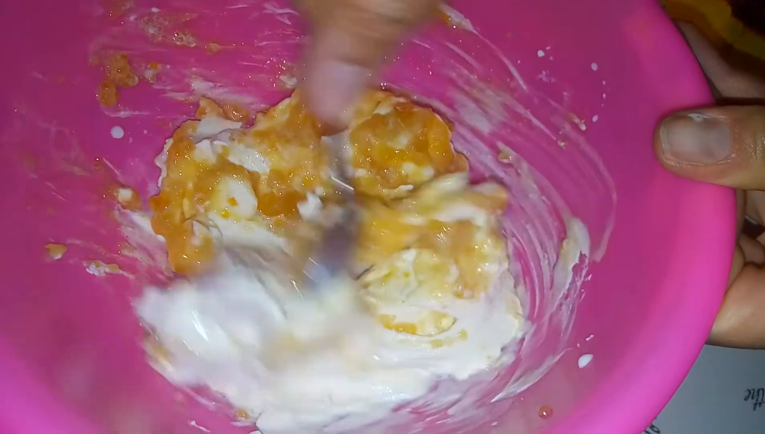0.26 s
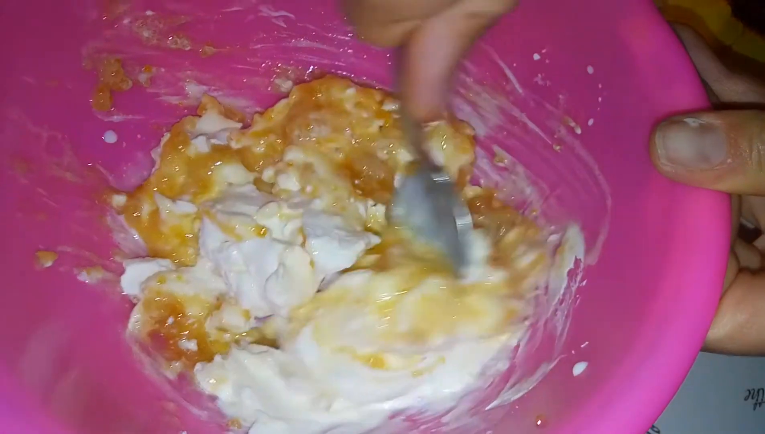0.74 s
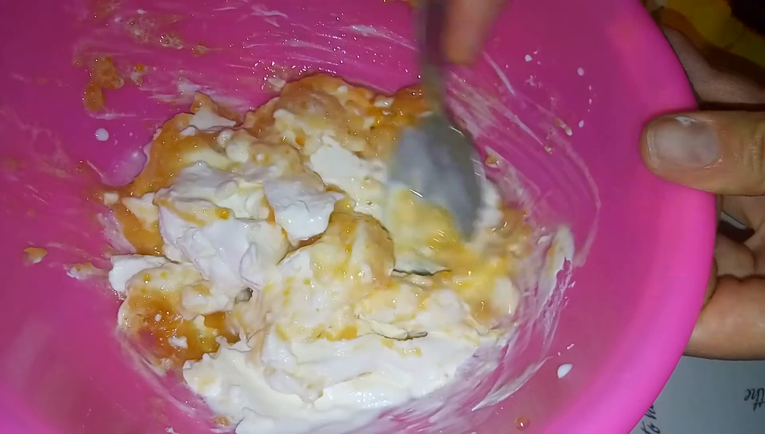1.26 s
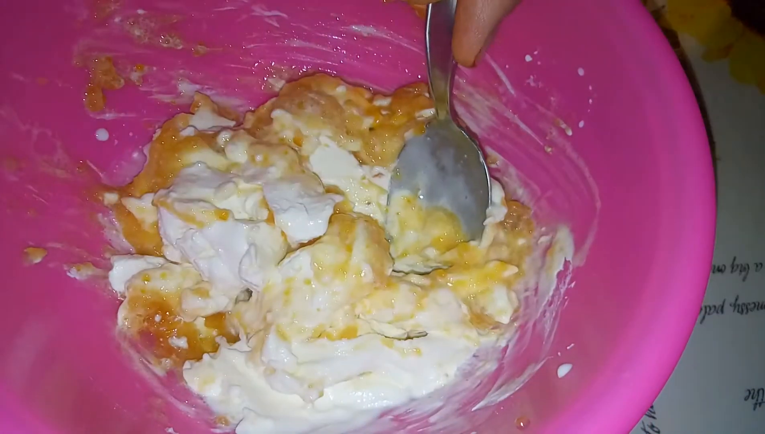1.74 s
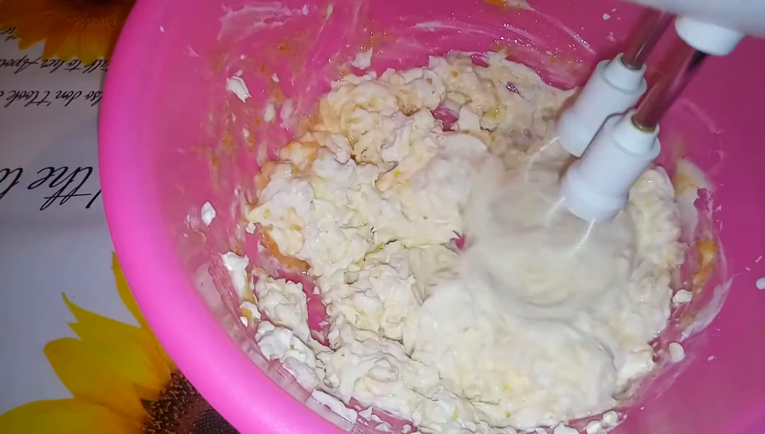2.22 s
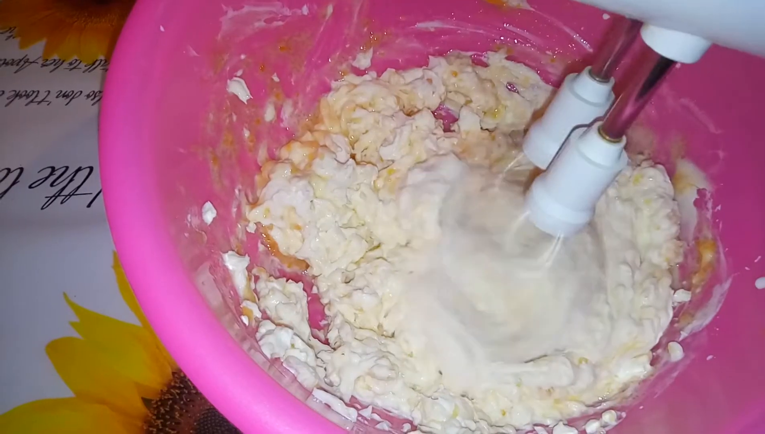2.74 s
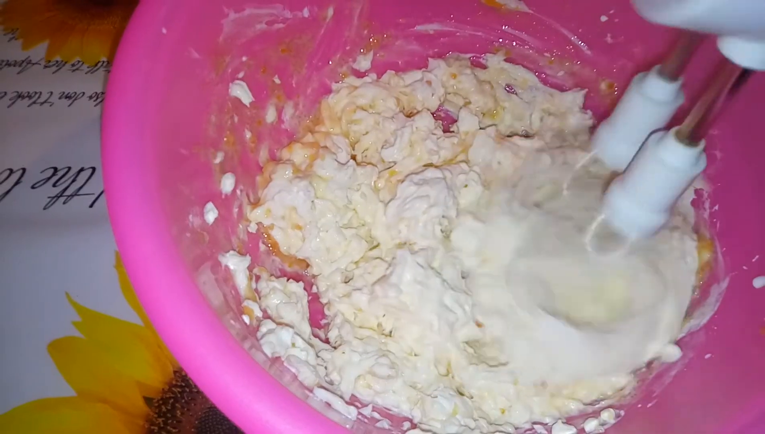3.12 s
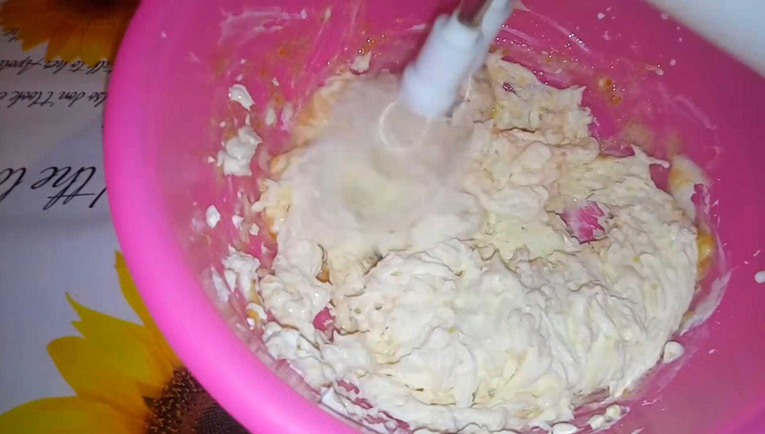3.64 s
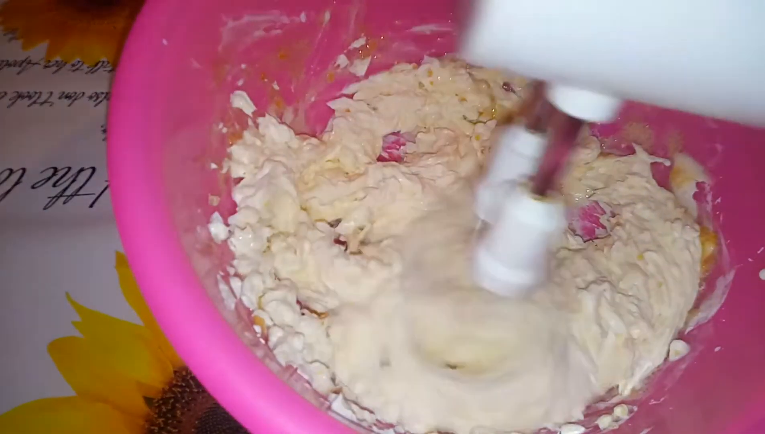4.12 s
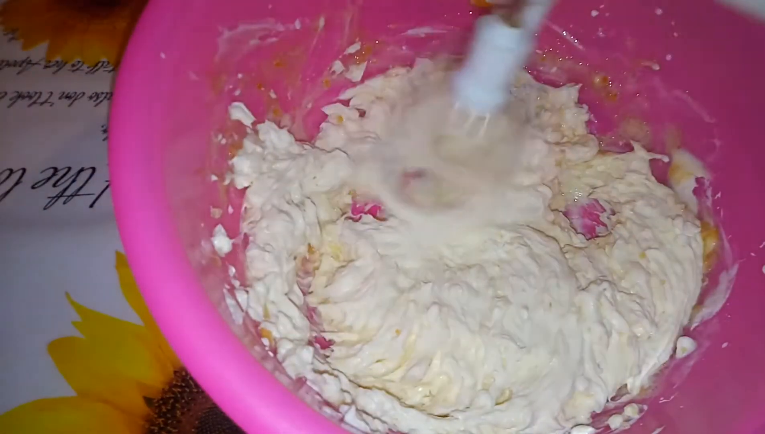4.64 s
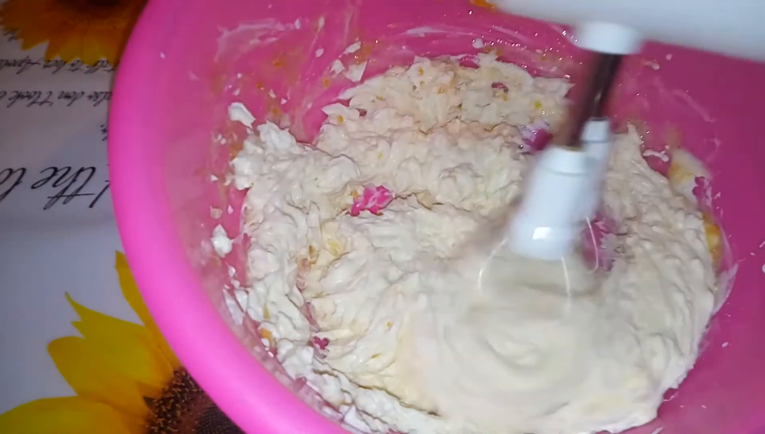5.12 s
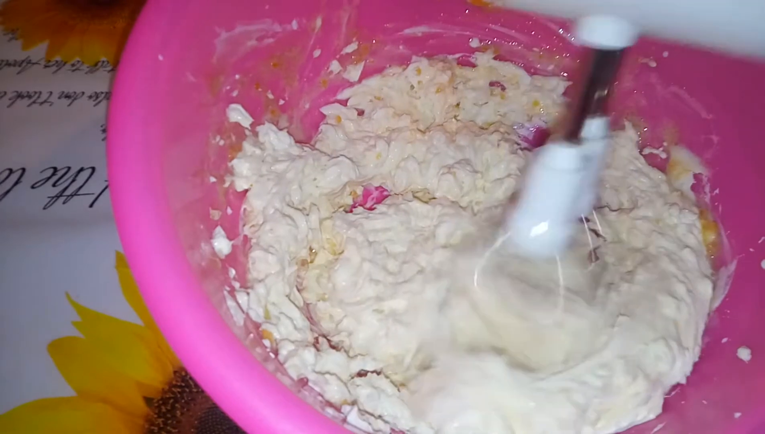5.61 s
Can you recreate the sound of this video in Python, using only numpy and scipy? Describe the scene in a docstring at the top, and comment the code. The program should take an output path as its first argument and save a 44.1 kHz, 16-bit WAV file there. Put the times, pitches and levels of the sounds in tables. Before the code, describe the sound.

Soft spoon clicks and scrapes in a bowl give way to a loud hand mixer whirring through cream, its air buffeting the microphone.

```python
"""Over the hum of a kitchen, a spoon drags, ticks and smacks through cream in a plastic bowl. At 2 s the scene
changes: a hand mixer runs close by, turning slowly, over a fainter hum; it is clicked up one step and whines.
Load bends its speed while the beaters drum the bowl. From 3.6 s, gusts from its vents buffet the microphone,
whose gain control ducks. One microphone, dull above 5 kHz."""
import sys
import numpy as np
from scipy import signal
from scipy.io import wavfile
from scipy.ndimage import uniform_filter1d

SR = 44100
rng = np.random.default_rng(int(sys.argv[2]) if len(sys.argv) > 2 else 0)


def wav_record(signal):
    """Record a signal, one row per channel, as 16-bit PCM in the file named by sys.argv[1]."""
    frames = np.transpose(np.atleast_2d(signal))
    bounded = np.clip(frames, -1, 1)
    # unit amplitude maps onto the largest positive 16-bit level
    quanta = np.round(bounded * 32767).astype(np.int16)
    wavfile.write(sys.argv[1], SR, quanta)


N = 258867
TIME_S = np.arange(N) / SR
CHANGE_S, STEP_S = 2.058, 2.661  # scene changes to the running mixer, mixer up one step

def gain_of(db):
    return 10 ** (np.asarray(db) / 20)

def unit_rms(x):
    return x / np.sqrt(np.mean(x ** 2) + 1e-20)

def butter(x, order, hz, kind="low"):
    return signal.sosfilt(signal.butter(order, hz, kind, fs=SR, output="sos"), x)

def band_rms(x, lo_hz, hi_hz):
    return np.std(butter(x, 4, [lo_hz, hi_hz], "band"))

def spectrum_db(points, hz):
    freq_hz, level_db = np.transpose(points)
    return np.interp(np.log(hz + 1), np.log(freq_hz + 1), level_db)

def follow(rows):
    """Each column after time_s, interpolated per sample."""
    time_s, *columns = np.transpose(rows)
    return [np.interp(TIME_S, time_s, column) for column in columns]

def ramp(start_s, rise_s):
    return np.clip((TIME_S - start_s) / rise_s, 0, 1)

def place(events):
    """Mix (start_s, sound) pairs into one track."""
    out = np.zeros(N)
    for start_s, sound in events:
        part = out[round(start_s * SR):][:len(sound)]
        part += sound[:len(part)]
    return out

def wander(rate_hz):
    """Smooth random drift, rms 1."""
    return unit_rms(butter(rng.standard_normal(N + SR), 2, rate_hz)[SR:])

def resonate(x, hz, width_hz, stages=1):
    """Unity-gain resonances in series: shift hz to zero, smooth, shift back."""
    carrier = np.exp(2j * np.pi * np.cumsum(np.full(len(x), hz)) / SR)
    pole = np.exp(-np.pi * width_hz / SR)
    for _ in range(stages):
        x = 2 * (carrier * signal.lfilter([1 - pole], [1, -pole], x / carrier + 1e-18)).real
    return x

def noise(db_at, patchy_db):
    """Noise shaped by db_at(hz, time_s), with drifting patches."""
    frames, hz = N // 256 + 5, np.fft.rfftfreq(1024, 1 / SR)[:, None]
    real, imag, patches = rng.standard_normal((frames, 513, 3)).T
    patches = unit_rms(uniform_filter1d(uniform_filter1d(patches, 10, axis=0), 16, axis=1))
    level_db = db_at(hz, np.arange(frames) * 256 / SR) + patchy_db * patches
    return signal.istft((real + 1j * imag) * gain_of(level_db), nperseg=1024, noverlap=768)[1][:N]

# still air and microphone hiss: freq_hz, density_db
AIR_SPECTRUM = [(25, -21.5), (60, -7), (150, 4.5), (250, -10.5), (500, -10.5), (1000, -14), (2000, -18.5),
                (4500, -21.5), (6500, -25), (8000, -37), (13800, -38), (14600, -25.5), (15600, -30)]
# machine hum: pitch_hz, level_db
HUM_TONES = [(100.1, -45.7), (98.37, -53), (49.1, -65), (589.5, -68.5), (1421, -79)]
def kitchen(beat_dip_s=.23):
    """Still air; two machines hum a little apart and beat."""
    air = noise(lambda hz, s: spectrum_db(AIR_SPECTRUM, hz), patchy_db=1.1)
    hum = sum((-1) ** k * gain_of(db) * np.sqrt(2) * np.sin(2 * np.pi * hz * (TIME_S - beat_dip_s))
              for k, (hz, db) in enumerate(HUM_TONES))
    hum *= np.where(TIME_S < CHANGE_S, 1, gain_of(-4))
    return gain_of(-59.5) * air / band_rms(air, 150, 15000) + hum

# spoon along the wall: time_s, rumble_db, scrape_db
DRAG_LEVELS = [(0.0, -61, -57.5), (0.32, -67, -81), (0.72, -56, -65), (0.86, -62, -62.5),
               (1.31, -57.5, -69), (1.56, -62.5, -67), (1.8, -72, -85), (2.05, -54, -82)]
def spoon_drag():
    """The dragged spoon rumbles and scrapes until the scene changes."""
    rumble_db, scrape_db = follow(DRAG_LEVELS)
    rumble = gain_of(rumble_db) * unit_rms(resonate(rng.standard_normal(N), 161, 106))
    grit = rng.standard_normal(N) * gain_of(5.6 * wander(120))
    scrape = gain_of(scrape_db) * unit_rms(resonate(grit, 2700, 2800))
    return (rumble + scrape) * (TIME_S < CHANGE_S)

# spoon on the wall: start_s, level_db, pitch_hz
SPOON_TICKS = [(0.119, -43, 1900), (0.131, -35, 3650), (0.169, -43, 4890), (0.182, -37, 3460),
               (0.226, -39.5, 4400), (0.302, -50, 1880), (0.343, -46, 5000), (0.351, -33, 2700),
               (0.369, -42, 2710), (0.52, -33.5, 3770), (0.541, -29.5, 4370), (0.591, -29, 3360),
               (0.667, -35, 6050), (0.678, -28, 2140), (0.694, -42, 3970), (0.784, -36, 2620),
               (0.868, -42, 5400), (0.891, -36.5, 2600), (0.938, -38, 5300), (1.049, -44, 3760),
               (1.076, -34, 3460), (1.117, -43, 3430), (1.175, -23, 3820), (1.352, -35, 3180),
               (1.374, -22.5, 2240), (2.035, -40, 4480)]
# wall modes, damped by cream: pitch_hz, level_db, t60_s
WALL_MODES = [(660, -6, .07), (880, -5, .06), (1300, -4, .05), (1660, -8, .05), (2040, 0, .06),
              (2790, -8, .04), (3370, -10, .04), (3900, -8, .04)]
def tick(level_db, pitch_hz, jolt_t60_s=.032):
    """Metal meets plastic: a short ring, a wider crack, and wall modes near the pitch."""
    t = np.arange(6000) / SR
    jolt = rng.standard_normal(len(t)) * gain_of(-60 * t / jolt_t60_s)
    contact = np.sin(2 * np.pi * pitch_hz * t) * (t < 1.5 / pitch_hz)
    ring = resonate(contact + .6 * jolt, pitch_hz, .33 * pitch_hz, stages=2)
    crack = resonate(jolt * gain_of(-60 * t / .023), pitch_hz, .8 * pitch_hz)
    crack = resonate(crack, pitch_hz, 1.6 * pitch_hz)
    wall = sum(gain_of(db - 6.3 * abs(np.log2(hz / pitch_hz)) - 60 * t / t60_s)
               * np.sin(2 * np.pi * hz * t) for hz, db, t60_s in WALL_MODES)
    crack_share = min(.55 * 2200 / pitch_hz, 1)  # low smacks are wider
    strike = (1 - crack_share) * ring / abs(ring).max() + crack_share * crack / abs(crack).max()
    return gain_of(level_db) * (strike + gain_of(-27) * wall)

# spoon on the bowl floor: start_s, level_db, pitch_hz
SPOON_THUDS = [(.12, -41, 1200), (.591, -37, 1600), (0.677, -35, 890), (0.87, -43, 990), (1.317, -41, 300),
               (1.346, -37, 220), (1.354, -34, 1200), (1.372, -26.5, 1230)]
def thud(level_db, pitch_hz, t60_s=.032):
    """Dull knock of the whole bowl, damped by cream."""
    t = np.arange(4000) / SR
    jolt = rng.standard_normal(len(t)) * gain_of(-60 * t / t60_s)
    body = resonate(jolt, pitch_hz, .43 * pitch_hz)
    return gain_of(level_db) * body / abs(body).max()

def room(x, t60_s=.16):
    """Reflections: sparse decaying taps of random sign."""
    taps = np.zeros(SR // 2)
    slots = np.arange(200, len(taps) - 20, 20)
    taps[slots + rng.integers(0, 20, len(slots))] = rng.choice([-1., 1.], len(slots))
    taps *= gain_of(-60 * TIME_S[:len(taps)] / t60_s)
    return signal.fftconvolve(x, taps / np.linalg.norm(taps))[:N]

# shaft speed under load: time_s, speed_hz
SHAFT_SPEED = [(2.06, 196.4), (2.65, 196.4), (2.73, 233), (2.82, 262), (2.91, 281), (3.0, 292),
               (3.1, 283.5), (3.21, 278.8), (3.43, 275.6), (3.87, 294.2), (3.98, 295.3), (4.2, 285.5),
               (4.31, 283), (4.46, 290), (4.64, 302), (4.75, 308), (4.86, 304), (5.19, 278.4),
               (5.74, 279.7), (5.87, 285.2)]
def shaft():
    """Motor speed, and the running count of turns with slight jitter."""
    speed_hz, = follow(SHAFT_SPEED)
    jittered_hz = uniform_filter1d(speed_hz, 2500) * (1 + .0018 * wander(40))
    return speed_hz, np.cumsum(jittered_hz) / SR

# tones set by step and speed: order, slow_db, fast_db, overspeed_db_per_hz
STEADY_TONES = [(1, -44.5, -43, 0.67), (5, -36.5, -48, 0), (24, -80, -63.5, 0.27)]
# tones that swell as the mixer is moved about: time_s, order2_db, order8_db, order16_db
SWELLING_TONES = [(2.06, -48.5, -45, -44), (2.65, -47.5, -48, -47), (2.72, -39, -40, -38),
                  (2.76, -38.5, -29, -36), (2.92, -29.5, -23, -25), (3.02, -31, -26, -32),
                  (3.2, -28, -24.5, -27), (3.37, -30, -26, -41), (3.5, -34.5, -33, -25),
                  (3.76, -34.5, -29, -28), (3.92, -37, -19, -30), (4.12, -33.5, -25, -22),
                  (4.28, -30, -27, -40), (4.42, -37.5, -30, -22), (4.56, -38, -19, -29),
                  (4.86, -32, -17, -29), (5.0, -32.5, -22, -24), (5.17, -28.5, -27, -31),
                  (5.32, -35.5, -30, -44), (5.45, -28, -28, -32), (5.75, -31, -30, -32),
                  (5.87, -39, -31, -34)]
def whine(speed_hz, turns, usual_hz=280):
    """Shaft orders as wavering sines; an uneven rotor adds order 9 on the fast step."""
    order2_db, order8_db, order16_db = follow(SWELLING_TONES)
    step = ramp(STEP_S, .043)
    overspeed_hz = np.maximum(speed_hz - usual_hz, 0)
    levels = [(order, slow_db + step * (fast_db - slow_db + db_per_hz * overspeed_hz))
              for order, slow_db, fast_db, db_per_hz in STEADY_TONES]
    levels += [(2, order2_db), (3, order2_db - 2), (8, order8_db), (16, order16_db)]
    tones = sum(gain_of(db + 2.03 * wander(25) + 1.9 * wander(170)) * np.sin(2 * np.pi * order * turns)
                for order, db in levels)
    side_tone = step * gain_of(-38 + 4.5 * wander(17)) * np.sin(2 * np.pi * 9 * turns)
    return np.sqrt(2) * (tones + side_tone)

# fan and gear noise: time_s, level_db, mid_lift_db, top_lift_db
RUSH_LEVELS = [(2.06, -29.5, -1, 3.5), (2.3, -30.5, 1.5, 5.5), (2.64, -29.5, -2, 3), (2.72, -26.5, 1.5, 5),
               (3.1, -25.5, 1.5, 4), (3.6, -25.5, -0.5, 4.5), (3.95, -24.5, -0.5, 3.5),
               (4.3, -23.5, 0.5, 3.5), (4.55, -25, -0.5, 3.5), (4.95, -24.5, 2.5, 6.5),
               (5.351, -24, -2.5, 1.5), (5.87, -24.5, -0.5, 1.5)]
# its spectrum on each step: freq_hz, density_db
SLOW_SPECTRUM = [(24, -47), (40, -12), (69, -20), (86, -31), (195, 6), (290, -12), (387, -4.5),
                 (422, -10.5), (671, -2), (913, -7.5), (975, -7.5), (1240, -6), (2150, -5), (2750, -4),
                 (3300, -1), (3550, -9.5), (4450, -4.5), (7730, -38), (10000, -85), (17000, -120)]
FAST_SPECTRUM = [(180, -20), (300, 1), (463, -11), (553, -10.5), (608, -8.5), (678, -1), (777, -9),
                 (832, -5), (915, -5), (1110, -5.5), (2100, -8), (2310, -2.5), (2980, -6), (4610, -6),
                 (7730, -37), (10000, -95), (17000, -120)]
# housing resonances: freq_hz, width_hz, lift_db
HOUSING_MODES = [(653, 170, 5), (1070, 100, 4), (1480, 350, 1), (2540, 280, 5), (3120, 140, 2),
                 (3740, 100, 2), (4060, 560, 1), (5250, 190, -5), (5440, 130, 5.5), (6070, 390, 0.5)]
def rush(turns, mid_hz=3400, top_hz=5200):
    """Fan and gear noise through the housing, fluttering once per turn."""
    time_s, level_db, mid_lift_db, top_lift_db = np.transpose(RUSH_LEVELS)

    def colour_db(hz, s):
        housing_db = sum(db / (1 + (2 * (hz - freq_hz) / width_hz) ** 2)
                         for freq_hz, width_hz, db in HOUSING_MODES)
        bell_db = np.interp(s, time_s, mid_lift_db) * np.exp(-np.log((hz + 1) / mid_hz) ** 2 / .17)
        shelf_db = np.interp(s, time_s, top_lift_db) / (1 + (top_hz / (hz + 1)) ** 8)
        return housing_db + bell_db + shelf_db

    slow = noise(lambda hz, s: spectrum_db(SLOW_SPECTRUM, hz) + colour_db(hz, s), patchy_db=1.45)
    fast = noise(lambda hz, s: spectrum_db(FAST_SPECTRUM, hz) + colour_db(hz, s), patchy_db=1.45)
    step = ramp(STEP_S, .084)
    slow *= np.sqrt(1 - step) / band_rms(slow, 625, 2160)
    fast *= np.sqrt(step) / band_rms(fast, 622, 2220)
    flutter = 1 + .061 * np.cos(2 * np.pi * turns)
    return gain_of(np.interp(TIME_S, time_s, level_db) + .89 * wander(80)) * flutter * (slow + fast)

# brush hiss: freq_hz, density_db
BRUSH_SPECTRUM = [(6000, -70), (7600, 0), (10500, -7), (13700, -17), (14700, -8), (15600, -9)]
def brushes(spark_t60_s=.03):
    """High hiss that follows the rush, with a spark as the switch steps."""
    rush_db, _, top_lift_db = follow(RUSH_LEVELS)
    treble_db = rush_db + top_lift_db
    spark = 1 + (TIME_S > STEP_S) * gain_of(21 - 60 * abs(TIME_S - STEP_S) / spark_t60_s)
    hiss = unit_rms(noise(lambda hz, s: spectrum_db(BRUSH_SPECTRUM, hz), patchy_db=2))
    return gain_of(-61.5 + .9 * (treble_db - treble_db.mean())) * spark * hiss

def switch(pitch_hz=4230, snap_s=.0027):
    """The speed switch clicks, then snaps home."""
    return place([(STEP_S, tick(-7, pitch_hz)), (STEP_S + snap_s, tick(-7.5, pitch_hz))])

# beater wires on cream and wall: time_s, level_db
SLAP_LEVELS = [(2.7, -32), (2.78, -33), (3.06, -37.5), (3.09, -27), (3.38, -31), (3.45, -24), (3.58, -29),
               (3.66, -44), (4.08, -40), (4.28, -31), (4.46, -33.5), (4.55, -42), (4.85, -33), (4.96, -23),
               (5.15, -23), (5.39, -30), (5.49, -20.5), (5.87, -24.5)]
# bowl and table resonances: pitch_hz, width_hz, level_db
HOLLOW_MODES = [(36, 30, -16), (68.5, 6.3, 5.5), (148.8, 21, 18), (195.4, 13, 12.5), (305, 50, -27)]
def beaters(turns, slaps_per_turn=.232, splash_s=.003):
    """Uneven slaps ring the hollow of the bowl; each throws a splash that rattles the wall."""
    slaps = np.diff(np.floor(slaps_per_turn * turns + .06 * wander(30)), prepend=0) > 0
    drive = unit_rms(slaps * gain_of(1.9 * rng.standard_normal(N))) + .5 * rng.standard_normal(N)
    hollow = sum(gain_of(db) * unit_rms(resonate(drive, hz, width_hz))
                 for hz, width_hz, db in HOLLOW_MODES)
    hollow = unit_rms(butter(hollow, 4, 520))  # cream softens each slap
    throws = slaps * gain_of(2 * rng.standard_normal(N))
    splash = signal.lfilter([1], [1, -np.exp(-1 / (splash_s * SR))], throws) * rng.standard_normal(N)
    rattle = unit_rms(resonate(splash, 1550, 1300, stages=3))
    level_db, = follow(SLAP_LEVELS)
    return gain_of(level_db) * unit_rms(hollow + gain_of(-5) * rattle) * ramp(STEP_S, .072)

# vent air on the microphone: start_s, hold_s, level_db
VENT_GUSTS = [(3.592, 0.24, -14.5), (3.891, 0.11, -17.5), (4.505, 0.19, -15.5)]
def gusts(rise_s=.062, fall_db_per_s=58):
    """Eddies burst on the microphone as lumpy rumble; the high ones die first."""
    out = np.zeros(N)
    for start_s, hold_s, level_db in VENT_GUSTS:
        lumps = gain_of(2.5 * np.clip(wander(70), -2, 2))
        deep = unit_rms(lumps * resonate(rng.standard_normal(N), 109, 170, stages=2))
        sharp = unit_rms(lumps ** 2 * resonate(rng.standard_normal(N), 306, 330, stages=2))
        fade = gain_of(-fall_db_per_s * np.maximum(TIME_S - start_s - hold_s, 0))
        out += gain_of(level_db) * ramp(start_s, rise_s) * fade * (deep + .36 * fade * sharp)
    return out

# sharpest eddies: centre_s, level_db, pitch_hz
EDDY_POPS = [(3.62, -8.5, 400), (3.638, -7, 303), (3.649, -3.5, 200), (3.678, 0, 334), (3.705, -5, 300),
             (3.719, -2, 420), (3.768, -7, 200), (3.811, 3, 410), (3.823, -3, 150), (3.925, -5, 220),
             (3.97, -1.5, 190), (3.996, -5, 330), (4.034, -11, 160), (4.493, -8, 298), (4.508, -4.5, 160),
             (4.557, -5, 257), (4.606, -3, 198), (4.679, -14, 403), (4.724, -9.5, 333)]
def pop(level_db, pitch_hz):
    """About two swings of the diaphragm under one bell-shaped push."""
    cycles = np.arange(-2, 2, pitch_hz / SR)
    push = gain_of(level_db) * np.exp(-(cycles / .5) ** 2)
    return push * np.cos(2 * np.pi * (cycles + rng.random()))

def diaphragm(wind):
    """The diaphragm rounds off the tallest swings; the low band remains."""
    return butter(.8 * np.tanh(wind / .8), 3, [42, 1100], "band")

def scene():
    speed_hz, turns = shaft()
    tones = whine(speed_hz, turns)
    clicks = place((s, tick(db, hz)) for s, db, hz in SPOON_TICKS) + switch()
    thuds = place((s, thud(db, hz)) for s, db, hz in SPOON_THUDS)
    contacts = butter(clicks + thuds + spoon_drag(), 6, 6200)
    mono = kitchen() + contacts + gain_of(-8) * room(contacts)
    # the current breaks briefly as the switch moves
    current = ramp(CHANGE_S, .0072) * (1 - .79 * np.exp(-((TIME_S - STEP_S + .0033) / .0058) ** 2))
    mono += current * (tones + rush(turns) + brushes() + beaters(turns))
    wind = gusts() + place((s - 2 / hz, pop(db, hz)) for s, db, hz in EDDY_POPS)
    mono += diaphragm(wind)
    return np.array([mono, mono])

def record(dry, knee_db=-18.5, slope=.52, edge_hz=15600):
    """Gain control ducks loud passages fast and recovers slowly; then the band limit."""
    power_db = 10 * np.log10(abs(uniform_filter1d((dry ** 2).mean(0), 2000)) + 1e-12)
    release_db = 30.5 * TIME_S
    held_db = np.maximum.accumulate(power_db + release_db) - release_db
    over_db = uniform_filter1d(np.maximum(held_db - knee_db, 0), 800)
    ducked = dry / gain_of(slope * over_db)
    lowpass = signal.firwin(511, edge_hz, window=("kaiser", 9), fs=SR)
    return signal.oaconvolve(ducked, lowpass[None], "same")

dry = scene()
out = record(dry)
wav_record(out)
```